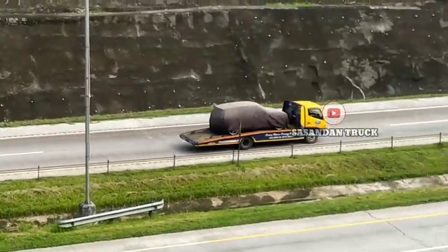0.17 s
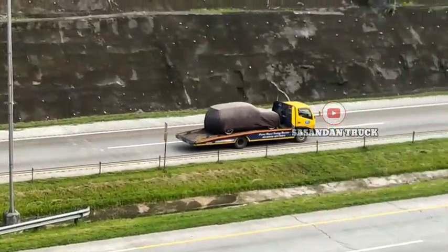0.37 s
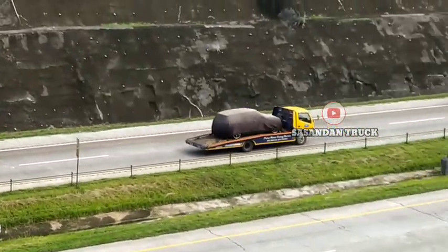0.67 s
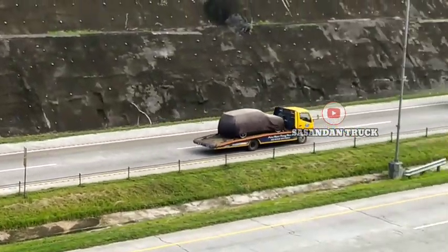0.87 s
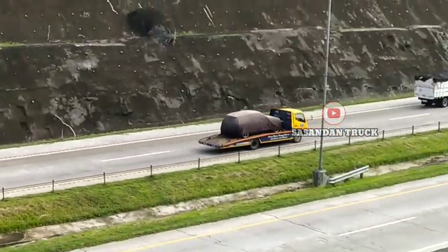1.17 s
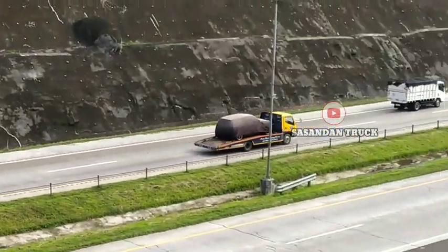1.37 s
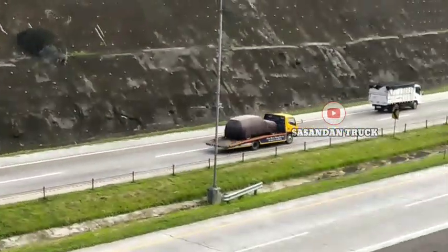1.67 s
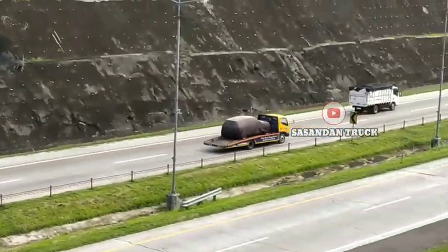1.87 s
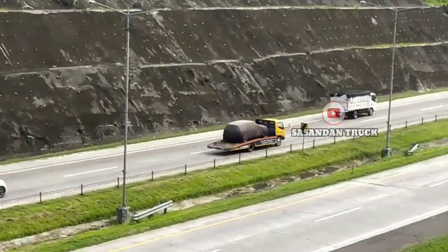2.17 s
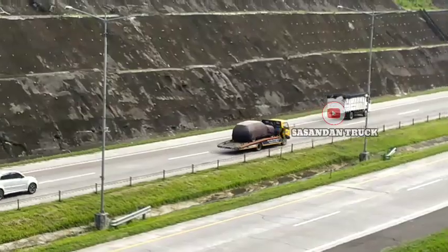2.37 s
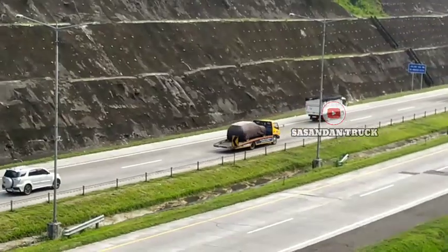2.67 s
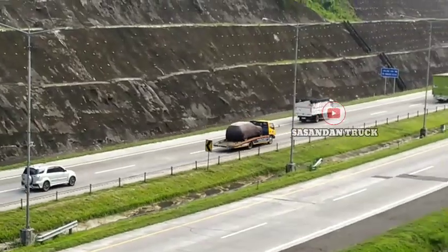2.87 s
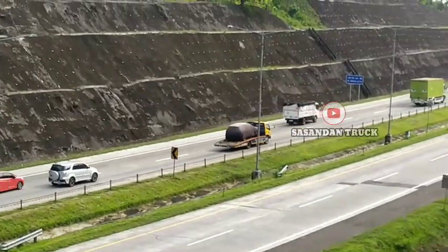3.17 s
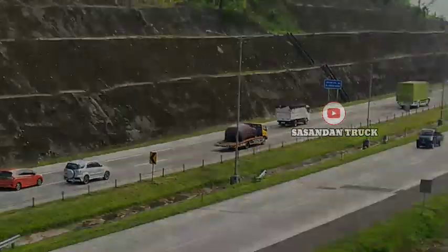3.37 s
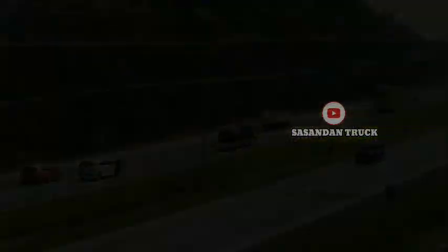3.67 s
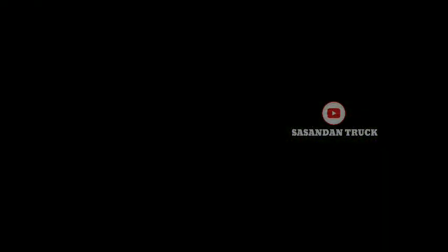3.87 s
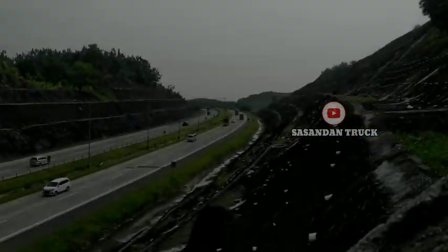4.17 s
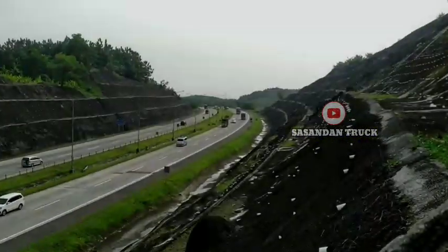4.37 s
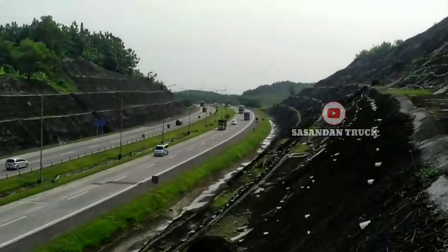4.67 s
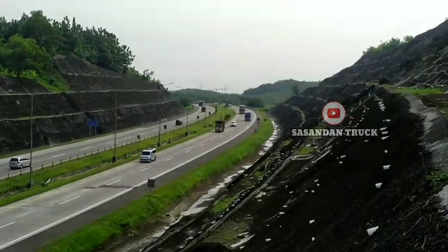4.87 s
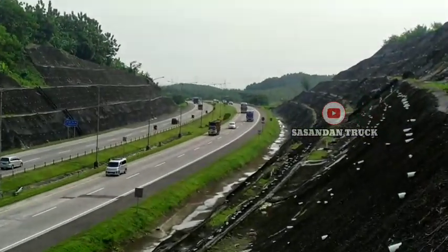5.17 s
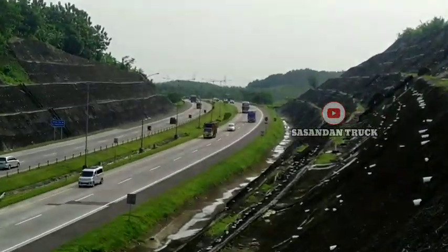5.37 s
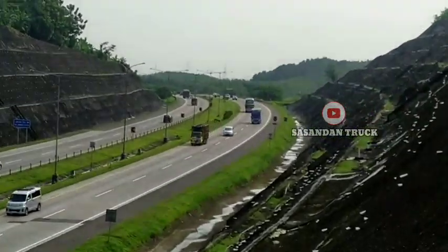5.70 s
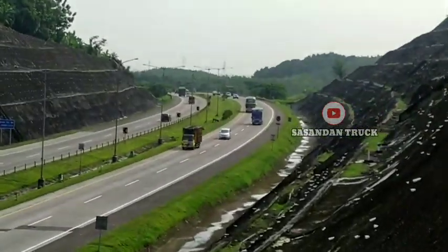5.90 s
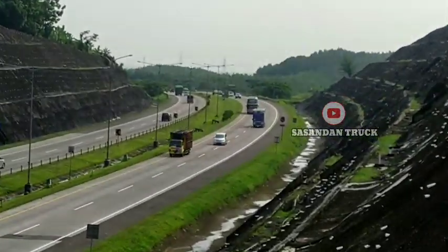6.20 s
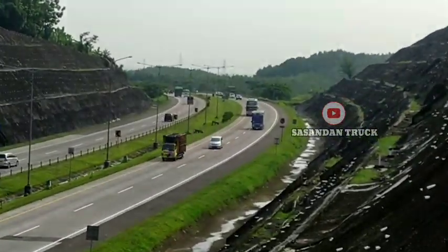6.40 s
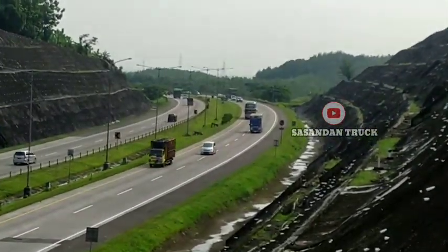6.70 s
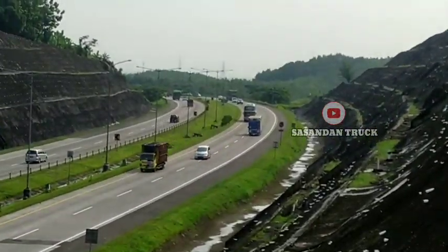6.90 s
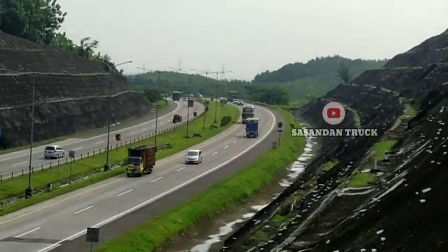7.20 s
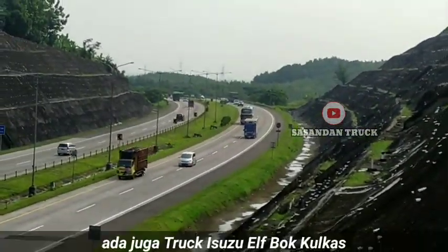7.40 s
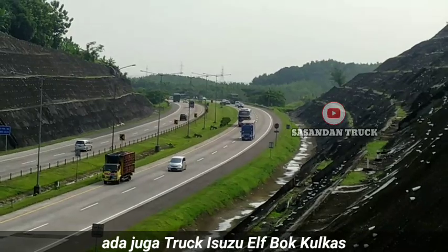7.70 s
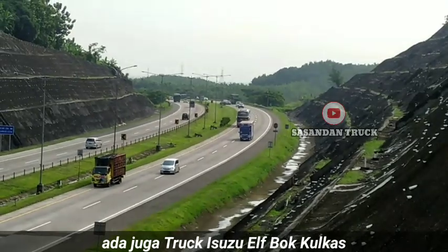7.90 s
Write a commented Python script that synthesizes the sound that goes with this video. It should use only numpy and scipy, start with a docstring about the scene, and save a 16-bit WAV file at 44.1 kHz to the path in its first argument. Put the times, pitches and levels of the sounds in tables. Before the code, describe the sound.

Steady traffic noise heard from a roadside slope at some distance. First, receding tyre roar with beating low exhaust notes and thin singing tyres leaning left. Around the middle it sinks and a second traffic view rises: stronger tyre hiss, repeated soft swishes and singing tyres, over a dominant smooth bass hum from a heavy diesel, rising very slightly in pitch. A small dip and a soft low puff come late; no horns.

```python
"""Motorway traffic heard from the bank of a rock cutting, at two microphone ports.
At first light trucks and a car drive away: low exhaust notes that swell and beat over tyre roar of coloured noise.
From about 3.3 to 4.8 s this view fades to a faint rest while one of the oncoming lanes fades in. There a heavy
diesel, a few harmonics of a slowly rising note, drones deeply. Tyres sing and swish as moving bands of noise
throughout; near 6.5 s the road noise dips briefly, and a soft low whoosh follows."""
import sys
import numpy as np
from scipy import signal
from scipy.fft import rfft, irfft, next_fast_len
from scipy.io import wavfile
from scipy.ndimage import uniform_filter1d, map_coordinates

SR = 44100
rng = np.random.default_rng(int(sys.argv[2]) if len(sys.argv) > 2 else 0)


def file_out(sig):
    """Save sig as 16-bit WAV at sys.argv[1]."""
    # one column per channel
    cols = np.atleast_2d(sig).T
    # limit, then scale
    lim = np.clip(cols, -1, 1)
    pcm = np.round(lim * 32767).astype(np.int16)
    wavfile.write(sys.argv[1], SR, pcm)


N = 355005

TOP_HZ = 14200  # nothing above this is kept
CHANGE_S = 4  # change from the leaving view to the oncoming one
# How the view of the leaving traffic fades down: (time [s], gain [factor])
FADE_OUT = [(3.25, 1), (3.85, 0.56), (4.5, 0.14)]
# How the view of the oncoming lane fades up: (time [s], gain [factor])
FADE_IN = [(3.55, 0.028), (3.73, 0.16), (4.15, 0.44), (4.5, 0.93), (4.75, 1)]


def amp(db):
    """Turn decibels into a gain factor."""
    return 10 ** (np.asarray(db) / 20)


def unit(x):
    """Scale a sound to an rms (average strength) of 1."""
    return x / np.sqrt(np.mean(x ** 2) + 1e-20)


def along(points, hz):
    """Read a value between (Hz, value) points, with the frequencies on a log axis."""
    point_hz, value = np.transpose(points)
    return np.interp(np.log(hz + 1), np.log(point_hz + 1), value)


def curves(rows):
    """Draw straight lines between timed rows: one value per sample for each column after the time."""
    s, *columns = np.transpose(rows)
    return [np.interp(np.arange(N) / SR, s, column) for column in columns]


def since(s):
    """Seconds since a moment, for each sample."""
    return np.arange(N) / SR - s


def wobble(rate):
    """A smooth random curve through about `rate` random points a second."""
    points = rng.standard_normal(int(N * rate / SR) + 4)
    knots = np.arange(0, N * rate / SR + 1, 1 / 8)
    smooth = map_coordinates(points, [knots], mode="mirror")
    return np.interp(np.arange(N) * rate / SR, knots, smooth)


def turning(hz):
    """Phase of something that repeats at a moving rate, from a random start."""
    return 2 * np.pi * (np.cumsum(hz) / SR + rng.random())


def filtered(x, response):
    """Filter x by a response that gives a (complex) factor for each frequency."""
    length = next_fast_len(N + 8192, True)
    spectrum = rfft(x, length) * response(np.fft.rfftfreq(length, 1 / SR))
    return irfft(spectrum, length)[..., :N]


def trend(db, db_per_s):
    """Gain that grows or shrinks steadily, given its level at the change of view."""
    return amp(db + db_per_s * since(CHANGE_S))


def view(s):
    """Fade gain of the view that a moment belongs to."""
    return curves(FADE_OUT if s < CHANGE_S else FADE_IN)[0]


def swell(s, half_s):
    """Strength of a vehicle that nears, is closest at s, and recedes."""
    falloff = 1.86  # power of distance by which a passing sound fades
    return np.hypot(1, since(s) / half_s) ** -falloff


def passing(s, half_s, db, hz, glide):
    """Pitch and gain of one vehicle going by; the pitch glide levels off far away."""
    reach_s = 2 * half_s
    pitch_hz = hz + glide * reach_s * np.tanh(since(s) / reach_s)
    return pitch_hz, amp(db) * swell(s, half_s) * view(s)


def note(hz, gain, overtone_db, rough, waver):
    """An engine or tyre note with one overtone; its strength and phase shake on the way."""
    phase = turning(hz) + waver * wobble(9)
    tone = np.sin(phase) + amp(overtone_db) * np.sin(2 * phase)
    return gain * unit(tone * (1 + rough * wobble(22)))


def sweep(hz, gain, width_hz, left_db, lag_ms):
    """A band of noise around a movable centre, heard at both ports, later on the left."""
    core = wobble(width_hz) + 1j * wobble(width_hz)
    skirt = wobble(3 * width_hz) + 1j * wobble(3 * width_hz)
    tone = (core + 0.32 * skirt) * np.exp(1j * turning(hz))
    late = np.exp(-2j * np.pi * hz * lag_ms / 1000)
    left = unit((tone * late).real)
    right = amp(-left_db) * unit(tone.real)
    return gain * np.array([left, right])


def patchy(patchy_db):
    """Two noises whose strength drifts in the same patches of time and frequency."""
    noise = signal.stft(rng.standard_normal((2, N)), nperseg=512)[2]
    field = rng.standard_normal(noise.shape[1:])
    field = uniform_filter1d(field, size=5, axis=0)  # across frequency
    field = uniform_filter1d(field, size=40, axis=1)  # across time
    return signal.istft(noise * amp(patchy_db * unit(field)), nperseg=512)[1][:, :N]


def lanes(colour, alike, side, lag, patchy_db):
    """Road noise at both ports: a direct part, later on the left, and a diffuse part off the rock."""
    def ports(hz):
        direct = np.clip(along(alike, hz), 0, .995)
        lean = amp(along(side, hz))
        late = np.exp(-2j * np.pi * hz * along(lag, hz) / 1000)
        strength = amp(along(colour, hz)) / np.hypot(1, lean)
        return strength * np.array([lean * late, direct, np.sqrt(1 - direct ** 2)])

    direct_noise, diffuse_noise = patchy(patchy_db)
    left, right, diffuse = filtered(np.array([direct_noise, direct_noise, diffuse_noise]), ports)
    return np.array([left, right + diffuse])


def tyres(road, trends):
    """Carcass roar, tread noise and the hiss of pumped air follow the stream and surge with close vehicles."""
    # Close vehicles that lift the road noise: (time [s], half length [s], full lift [dB])
    surges = [(5.008, 0.37, 5.5), (6.25, 0.23, 4), (6.654, 0.18, 6), (7.97, 0.065, 4)]
    # Share of that lift in roar, tread noise and hiss: one number each [factor]
    surge_shares = [0.15, 0.13, 0.83]
    edges_hz = [200, 900, 3800, TOP_HZ]
    surge_db = sum(db * swell(s, half_s) for s, half_s, db in surges)
    flutter = wobble(14)  # a shared random flutter of the road noise, deepest in the treble
    flutter_db = [0, .2, .65]
    total = 0
    for level, share, depth, low, high in zip(trends, surge_shares, flutter_db, edges_hz, edges_hz[1:]):
        band = unit(filtered(road, lambda hz: (hz >= low) & (hz < high)))
        total = total + trend(*level) * amp(share * surge_db + depth * flutter) * band
    return total


def roadway():
    """Tyre noise of the leaving lanes gives way to that of the oncoming ones, which dips briefly."""
    # Tone colour of each road noise: (frequency [Hz], density relative to its band [dB])
    leaving_colour = [(120, -24), (210, -7), (310, -6), (520, -5), (780, -5), (980, -3), (1250, -2),
                      (1480, -5.5), (1850, -4.5), (2480, -9), (2900, -11), (5200, -20.5), (8100, -23),
                      (9000, -29.5), (11500, -34), (14000, -47.5)]
    coming_colour = [(120, -25), (210, -6), (330, -9), (500, -6.5), (780, -5.5), (1150, 0.9), (1550, 1.4),
                     (2100, 0.5), (2500, -1.5), (3200, -6), (4000, -13.5), (5900, -19), (6900, -19.5),
                     (8500, -26.5), (9600, -32.5), (10800, -32.5), (12200, -43), (13100, -40.5),
                     (14000, -52)]
    # Likeness of the left and right sound: (frequency [Hz], likeness [0 to 1])
    leaving_alike = [(200, 0.95), (750, 0.96), (950, 0.49), (1250, 0.64), (1800, 0.32), (2400, 0.14),
                     (3800, 0.098), (10000, 0.053)]
    coming_alike = [(200, 1), (550, 0.56), (1600, 0.66), (2400, 0.26), (3800, 0.11), (10000, 0.087)]
    # Lean to the left: (frequency [Hz], left minus right [dB])
    leaving_side = [(200, 3.5), (650, -1.5), (920, 4), (1500, 0.5), (2100, 9), (2800, 8.5), (3500, 1),
                    (5000, 0), (8000, 5.5), (9800, 2), (12000, 7)]
    coming_side = [(200, 1), (450, 1.5), (780, -2.5), (1300, 5), (1700, 4.5), (2200, 12.5), (3300, 5),
                   (4400, 6), (7500, 4.5), (9500, 0)]
    # Sound bends round the body between the ports: (frequency [Hz], delay of the left port [ms])
    leaving_lag = [(200, .1), (400, 0.31), (800, 0.091), (1150, 0.35), (3000, 0.431)]
    coming_lag = [(200, 0.06), (600, 0.29), (900, 0.12), (1300, 0.3), (1900, 0.3), (3000, 0.425)]
    # Streams that recede or near, a row each for roar, tread noise and hiss:
    # (level at the change of view before fade and surges [dB], drift [dB per s])
    leaving_tyres = [(-39.5, -1.3), (-31.5, -0.31), (-46, -1.8)]
    coming_tyres = [(-39.5, 0.68), (-30, 0.77), (-44.5, 0.37)]
    leaving_road = lanes(leaving_colour, leaving_alike, leaving_side, leaving_lag, patchy_db=1.0)
    coming_road = lanes(coming_colour, coming_alike, coming_side, coming_lag, patchy_db=1.26)
    leaving = curves(FADE_OUT)[0] * tyres(leaving_road, leaving_tyres)
    coming = curves(FADE_IN)[0] * tyres(coming_road, coming_tyres)
    dip_db = -1.5 * swell(6.48, half_s=.08)
    return leaving + amp(dip_db) * coming


def rumble(colour):
    """Many mingled exhausts: low coloured noise, almost alike at both ports."""
    noise = rng.standard_normal((2, N))
    shared, apart = unit(filtered(noise, lambda hz: amp(along(colour, hz))))
    return shared + amp(-17.5) * np.array([apart, -apart])


def stream_rumble():
    """The mingled exhausts of each stream blur into a rumble; one stream recedes and the other nears."""
    # Tone colour of each exhaust rumble: (frequency [Hz], relative density [dB])
    leaving_rumble_colour = [(20, -17), (40, -17), (49, -2.5), (68, -2), (88, 2.5), (105, -1), (140, -2.5),
                             (200, -5), (260, -18.5), (400, -57)]
    coming_rumble_colour = [(20, -10), (42, -16), (53, -5), (73, 8), (105, -2), (140, -3.5), (195, -5),
                            (265, -15), (400, -61)]
    leaving = curves(FADE_OUT)[0] * trend(-40.5, db_per_s=-1.7) * rumble(leaving_rumble_colour)
    coming = curves(FADE_IN)[0] * trend(-35.5, db_per_s=0.14) * rumble(coming_rumble_colour)
    return leaving + coming


def whoosh():
    """A soft low band of noise rises quickly and dies away more slowly."""
    peak_s, centre_hz, peak_db = 6.64, 315, -40.5
    rise_db_per_s, fall_db_per_s = 179, 26
    t = since(peak_s)
    gain = amp(peak_db + np.minimum(rise_db_per_s * t, -fall_db_per_s * t))
    return sweep(np.full(N, centre_hz), gain, width_hz=170, left_db=0.0, lag_ms=0.089)


def swishes():
    """The tread noise of each vehicle swishes by as a noise band whose centre glides."""
    # Single vehicles: (loudest at [s], half length [s], level before fade [dB],
    # centre then [Hz], glide then [Hz per s])
    swish_rows = [(0.296, .7, -39, 2428, -59), (1.749, .6, -36.5, 2343, -120), (2.552, .2, -39, 2140, -300),
                  (3.254, .28, -38, 1760, -150), (3.8, .5, -41.5, 2317, 0),
                  (4.603, .22, -40.5, 2796, 199.5), (5.1, .4, -37.5, 3317, 299.5),
                  (5.299, .55, -33.5, 2282, 220), (5.9, .2, -34, 2750, 700), (7.35, .22, -31, 2378, 400),
                  (7.75, .28, -35, 2497, 300)]
    # Each band: (width setting [Hz], left louder [dB], delay of the left port [ms])
    leaving_band, coming_band = (330, 6.2, 0.43), (480, 9.9, 0.35)
    total = 0
    for s, *rest in swish_rows:
        band = leaving_band if s < CHANGE_S else coming_band
        total = total + sweep(*passing(s, *rest), *band)
    return total


def groove_song():
    """Tyres cross unevenly spaced grooves in the concrete and sing at a pitch set by their speed."""
    # Singing tyres: (loudest at [s], half length [s], level before fade [dB], pitch [Hz],
    # width setting [Hz], left louder [dB])
    songs = [(0.36, .26, -33.5, 1237, 50.1, 8), (0.4, 0.063, -30, 1308, 60.2, 12),
             (0.348, .25, -36, 1114, 42.1, 7), (1.5, 0.3, -39.5, 1125, 58.2, 8),
             (2.15, 0.28, -40, 1245, 65.1, 11), (2.65, 0.3, -34, 1116, 50.2, 8),
             (3.35, 0.73, -38.5, 1203, 40.1, 16), (3.7, 0.55, -41.5, 1098, 39.95, -2),
             (3.6, .4, -40, 1410, 69.9, 10), (4.25, 0.79, -36.5, 1400, 46, 15),
             (5.1, 0.47, -38.5, 1093, 55.04, 5), (5.34, 0.22, -31.5, 1390, 95, 4),
             (6.015, 0.17, -30, 1334, 89.9, 10), (6.1, 0.18, -37, 1077, 60.1, 10),
             (6.67, 0.11, -34, 1330, 54.7, 19), (7.47, 0.48, -32, 1352, 70, 18),
             (7.4, 0.25, -36.5, 1235, 61.6, 17), (7.853, 0.2, -33, 1385, 68, 11),
             (8.031, 0.071, -33, 1130, 45.1, 3)]
    return sum(sweep(*passing(s, half_s, db, hz, 0), width_hz, left_db, lag_ms=0.27)
               for s, half_s, db, hz, width_hz, left_db in songs)


def lug_hum():
    """Blocks of lugged truck tyres strike the road at a regular rate and hum."""
    # Humming tyres: (loudest at [s], half length [s], level before fade [dB],
    # block rate then [Hz], glide then [Hz per s])
    lugs = [(0.1, 0.72, -42, 353.5, 0.79), (1.6, 0.62, -49, 355.3, 0.5), (7.88, .2, -42, 346.7, 2)]
    return sum(note(*passing(*row), overtone_db=-18, rough=0.22, waver=0.25) for row in lugs)


def engine_drones():
    """Rough upper engine notes, strongly shaken in strength and phase."""
    # Upper notes: (loudest at [s], half length [s], level before fade [dB],
    # rate then [Hz], glide then [Hz per s])
    drones = [(1.2, 1.2, -48.5, 232.3, .5), (2.1, 0.99, -46.5, 183, 0), (3.03, 0.22, -47, 199, 2.5),
              (3.4, 0.86, -47.5, 214, 0), (1.2, .35, -45.5, 523.4, 0), (1.447, 0.18, -47, 550, 0),
              (5.4, 0.62, -50, 182.8, 1.5), (6.25, 0.25, -47, 194.5, 1), (7.596, 0.24, -45.5, 172.3, -20)]
    return sum(note(*passing(*row), overtone_db=-16, rough=0.61, waver=.8) for row in drones)


def single_exhausts():
    """Each exhaust sounds a note at its engine's firing rate; close notes beat against each other."""
    # Exhaust notes: (loudest at [s], half length [s], level before fade [dB],
    # firing rate then [Hz], glide then [Hz per s])
    exhausts = [(.2, .25, -41, 58.5, 0.5), (2.1, 0.91, -45, 57.5, 0.1), (2.449, 0.504, -39.5, 154.6, 3),
                (3.702, .3, -40, 160.8, 4), (7.203, 1.5, -38, 75.2, 0.5)]
    return sum(note(*passing(*row), overtone_db=-20.5, rough=0.16, waver=.16) for row in exhausts)


def truck():
    """The nearest leaving truck: a low exhaust note that sinks slowly, with short uneven swells."""
    # Short swells of the low note, as where close exhaust notes and rumble beat together:
    # (time [s], peak level [dB])
    short_swells = [(.012, -24), (.078, -24.5), (.15, -26), (.25, -30), (.328, -24), (.395, -29),
                    (.46, -31), (.73, -27), (.83, -30), (.97, -30), (1.06, -31), (1.168, -29), (1.28, -32),
                    (1.42, -30), (1.52, -31), (1.615, -30), (1.72, -34), (1.83, -29), (2.04, -35),
                    (2.16, -34), (2.26, -31), (2.39, -34), (2.5, -28), (2.68, -34), (2.83, -34),
                    (2.94, -31), (3.16, -31), (3.32, -35), (3.43, -36), (3.61, -33), (3.73, -27)]
    swell_half_s = .022
    firing_hz, sag_hz_per_s = 66.9, 0.698  # firing rate at the change of view
    swells = sum(amp(db) * np.exp(-(since(s) / swell_half_s) ** 2) for s, db in short_swells)
    steady = trend(-40.5, db_per_s=-.3) * curves(FADE_OUT)[0]
    phase = turning(firing_hz - sag_hz_per_s * since(CHANGE_S)) + 0.37 * wobble(9)
    return (steady + swells) * (np.sin(phase) + amp(-15.5) * np.sin(2 * phase))


def diesel():
    """A heavy exhaust booms evenly at its firing rate with peaked crests, a little later at the left port."""
    # Strength of the lowest harmonic before the fade: (time [s], level [dB])
    boom_level = [(4.1, -17.5), (4.55, -19), (4.8, -17), (5.7, -18), (6.7, -17.5), (7.38, -18.5),
                  (7.6, -20), (7.95, -17.5), (8.0, -18)]
    # Second harmonic compared with the lowest: (time [s], level [dB])
    second_level = [(3.9, -18.5), (4.15, -14.5), (4.7, -15.5), (5.2, -19), (6.1, -20), (7.3, -25.5)]
    firing_hz, rise_hz_per_s = 61.3, .48  # it slowly gathers speed; rate at the change of view
    lag_ms = 0.39
    phase = turning(firing_hz + rise_hz_per_s * since(CHANGE_S)) + .02 * wobble(8)
    second = amp(curves(second_level)[0] + 1.3 * wobble(7)) * np.cos(2 * phase)
    third = amp(-33) * np.cos(3 * phase)
    gain = curves(FADE_IN)[0] * amp(curves(boom_level)[0] + .2 * wobble(14))
    boom = gain * np.sqrt(2) * (np.cos(phase) + second + third)
    late_boom = filtered(boom, lambda hz: np.exp(-2j * np.pi * hz * lag_ms / 1000))
    return np.array([late_boom, boom])


def scene():
    """Low notes are nearly equal at both ports; tyre noise is wide and mostly leans left."""
    tyre_sounds = roadway() + swishes() + groove_song()
    low_notes = stream_rumble() + lug_hum() + engine_drones() + single_exhausts() + truck() + diesel()
    balance = amp([[.4], [-.4]])  # left a little up, right a little down
    return tyre_sounds + whoosh() + low_notes * balance


def record(dry):
    """The recorder keeps nothing above its band limit."""
    return filtered(dry, lambda hz: hz < TOP_HZ)


dry = scene()
out = record(dry)
file_out(out)
```